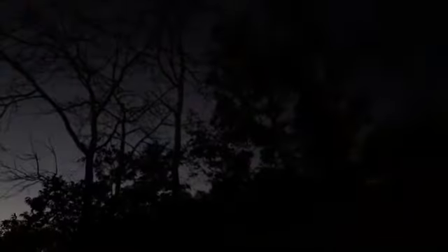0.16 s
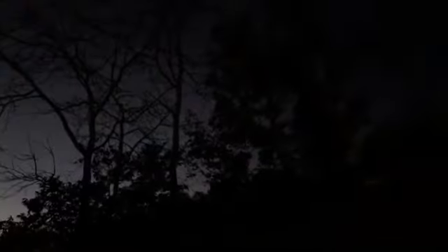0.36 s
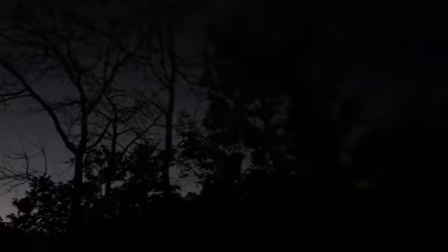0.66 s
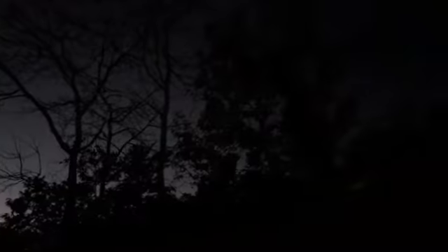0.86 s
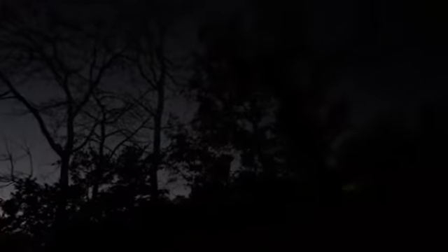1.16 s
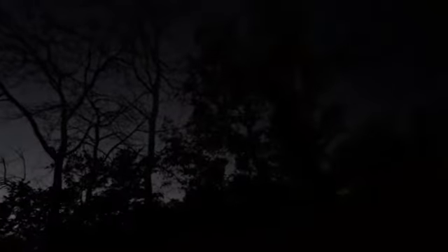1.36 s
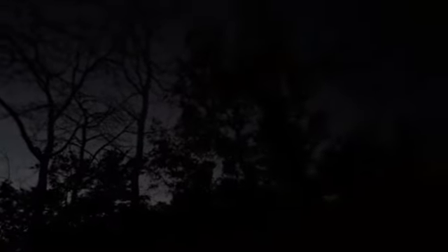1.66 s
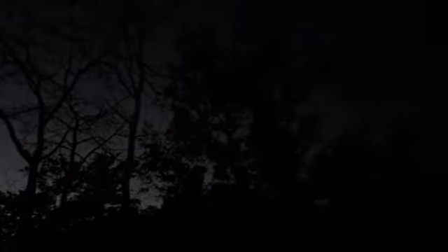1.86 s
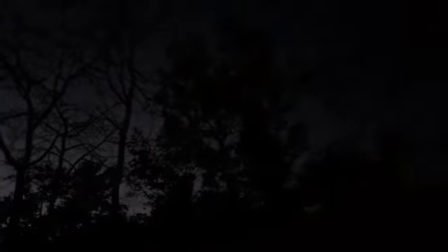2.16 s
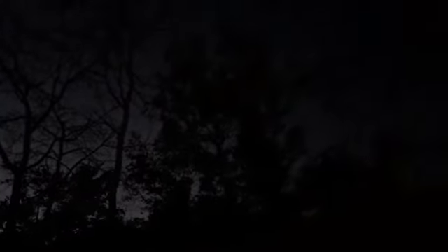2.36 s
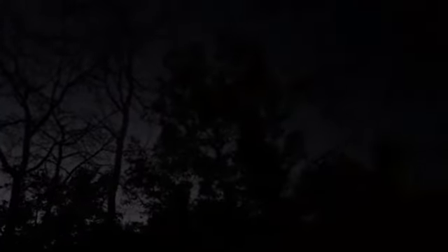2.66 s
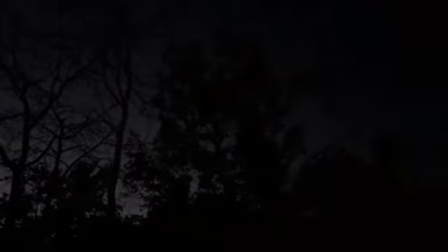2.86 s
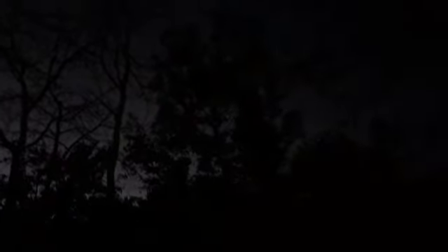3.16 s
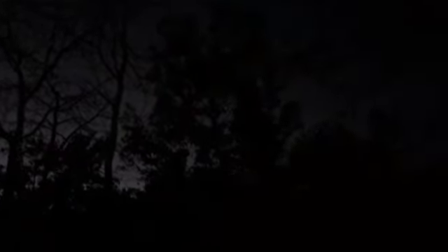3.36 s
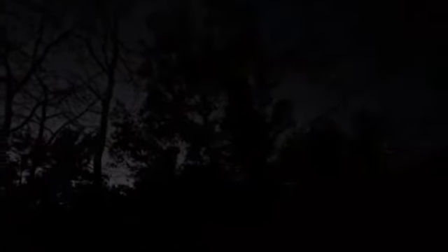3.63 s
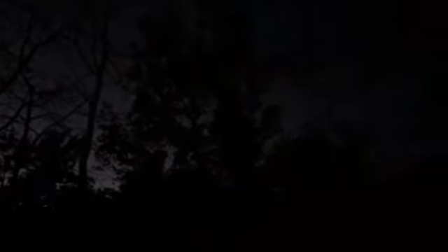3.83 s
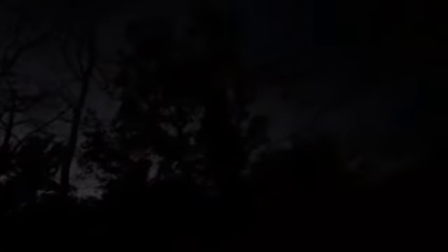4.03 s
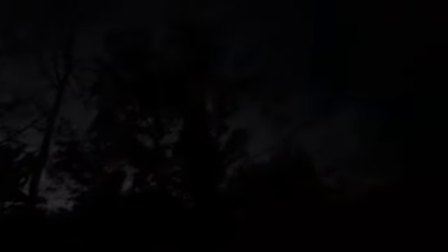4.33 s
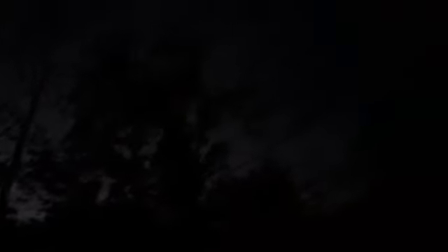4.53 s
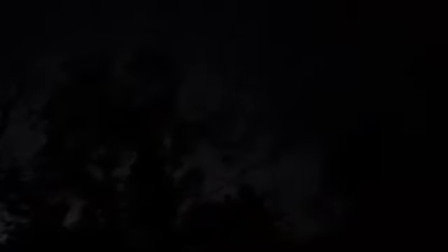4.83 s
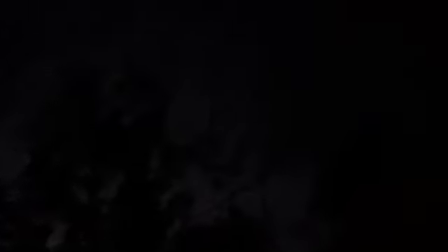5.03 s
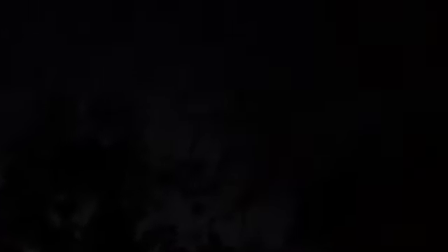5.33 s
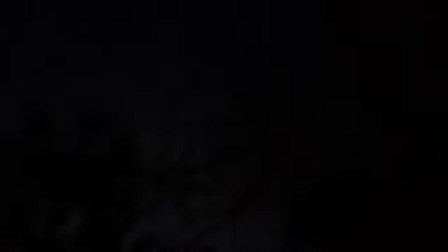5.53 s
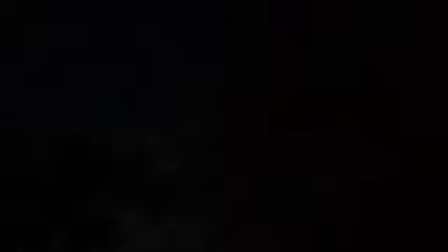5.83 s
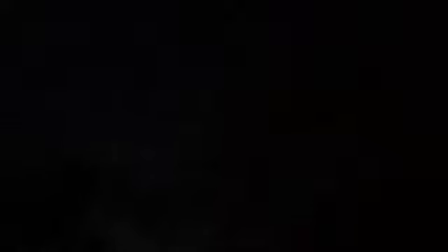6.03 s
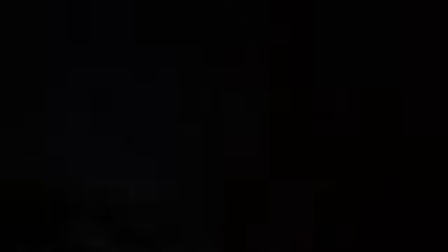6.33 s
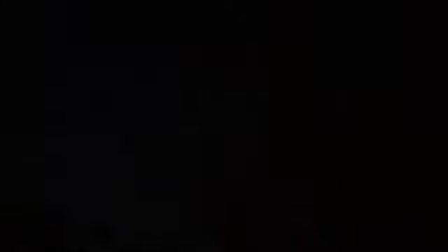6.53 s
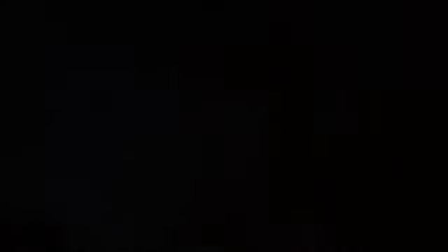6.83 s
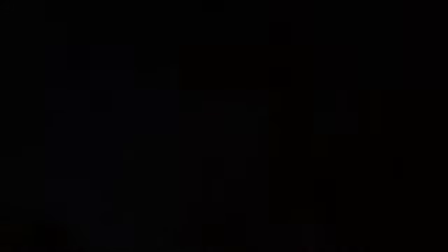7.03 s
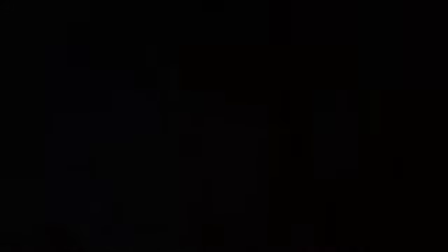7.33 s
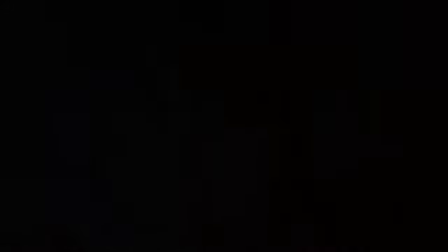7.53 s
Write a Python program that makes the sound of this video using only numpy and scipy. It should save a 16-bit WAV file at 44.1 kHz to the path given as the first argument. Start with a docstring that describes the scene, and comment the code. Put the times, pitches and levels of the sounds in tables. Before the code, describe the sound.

In windy dark woodland, rising and falling owl wails ring among the trees between soft quick trills and brief pure hoots.

```python
"""An owl wails up and down, hoarse at the start, over a low trill near 620 Hz in a wood at night;
the trees answer for a second or two. Short, almost pure toots sit higher, most of them near 850 Hz.
The voices are sums of gliding sines, straight ahead of a hand-held camera; the trees are decaying
noise echoes. A thin distant screech and a few dry ticks pass, while wind buffets the two
microphone ports over rustling leaves and distant night noise, all shaped from random noise."""
import sys
import numpy as np
from scipy import signal
from scipy.fft import rfft, irfft, next_fast_len
from scipy.io import wavfile
from scipy.ndimage import uniform_filter1d, minimum_filter1d

SR = 44100
rng = np.random.default_rng(int(sys.argv[2]) if len(sys.argv) > 2 else 0)


def int16_out(signal):
    """Quantize to a 16-bit WAV file."""
    q = np.round(np.clip(np.atleast_2d(signal).T, -1, 1) * 32767)
    wavfile.write(sys.argv[1], SR, q.astype(np.int16))


N = 339129  # samples


def undb(db):
    """Decibels to amplitude gain."""
    return 10 ** (np.asarray(db) / 20)


def curve(table):
    """Columns of a table, joined by straight lines over the times in its first column."""
    s, *columns = np.transpose(table)
    return [np.interp(np.arange(N) / SR, s, c) for c in columns]


def walk(rate):
    """Random levels held for 1 / rate seconds and smoothed twice; spread near 1."""
    hold = int(SR / rate)
    steps = np.repeat(rng.standard_normal(N // hold + 1), hold)
    return 1.36 * uniform_filter1d(uniform_filter1d(steps, hold), hold)[:N]


def bump(centre, length, flat):
    """Sample range and rounded swell, above half height for length seconds; a larger flat squares it."""
    first = max(int((centre - 2 * length) * SR), 0)
    last = min(int((centre + 2 * length) * SR), N)
    i = np.arange(first, last)
    return i, np.exp(-np.log(2) * np.abs(2 * (i / SR - centre) / length) ** flat)


def roughness():
    """Levels over time of the throb, the rasp and the period doubling in the wailing voice."""
    # hoarse stretches: centre_s, length_s, quarter-pitch throb_db, irregular rasp_db (both relative)
    rasps = [(0.155, 0.036, -18.5, -7), (3.41, .08, -22, -15), (3.483, 0.046, -10, -20),
             (3.539, .05, -7.5, -9), (3.585, 0.033, -12.5, -29), (5.802, 0.041, -9.5, -7.5),
             (5.872, 0.073, -21, -22), (7.644, 0.039, -26, -20)]
    # stretches where the period doubles: centre_s, length_s, level_db of the 1.5 x partial before its trim
    doublings = [(3.655, 0.098, -21), (3.768, .06, -43), (5.89, 0.17, -45), (6.15, .3, -51),
                 (7.69, .03, -40)]
    throb, rasp, doubled = np.zeros((3, N))
    for s, length, throb_db, rasp_db in rasps:
        i, swell = bump(s, length, flat=4.5)
        throb[i] += undb(throb_db) * swell
        rasp[i] += undb(rasp_db) * swell
    for s, length, db in doublings:
        i, swell = bump(s, length, flat=5.)
        doubled[i] += undb(db) * swell
    return throb, rasp, doubled


def wails():
    """A near-sine voice whose overtones grow with effort; partials flicker apart, throb, rasp or double."""
    # one table a wail: time_s, pitch_hz, relative fundamental_db, effort_db relative to full voice
    calls = [
        [(0.1, 814, -56.5, -90), (0.136, 817, -25, -75), (0.165, 764, -20.5, -30), (0.19, 767, -14.5, -10),
         (0.316, 831, -11, -3.5), (0.44, 852.2, -4.5, 1), (0.52, 846, -8, 0), (0.6, 830, -15, -3),
         (0.702, 801.4, -21.5, -6), (0.824, 725, -25, -18), (0.876, 705, -31.5, -30), (0.95, 770, -33, -60)],
        [(3.33, 690, -41, -80), (3.385, 771, -32, -55), (3.436, 740.5, -34, -27), (3.552, 790, -22, -17),
         (3.632, 863, -11.5, -8), (3.685, 875, -14, -3), (3.71, 852, -16, -1), (3.76, 851.3, -13, -3),
         (3.858, 799, -14.5, -3), (3.942, 757, -28, -10), (4.03, 735, -33, -20), (4.075, 714, -39, -80)],
        [(5.75, 724, -45.5, -75), (5.804, 800, -27.5, -28), (5.856, 762.6, -29, -19), (5.938, 773, -25, -15),
         (6.036, 843, -10, -4.5), (6.078, 856, -10.5, -2.5), (6.15, 844, -9.5, -2), (6.19, 834, -10.5, -5),
         (6.26, 795.4, -20, -11), (6.392, 730, -25.5, -22), (6.455, 718, -50, -70)],
        [(7.615, 705, -46, -90), (7.644, 762, -31, -22), (7.69, 773, -23.5, -12)],
    ]
    # each wail faces its own way: second_db (gain of the second partial), dull_db per multiple above the third
    facing = [(-3.5, 0), (2.5, -1.5), (2.5, -2.2), (4, -4)]
    # overtones: multiple of the pitch, level_db at full voice, db lost per db of effort
    upper = [(2, -30.5, .3), (3, -31.5, .75), (4, -43, .95), (5, -49, 1.5), (6, -58, 3.0), (7, -56, 3.0),
             (8, -64, 3.8), (9, -61, 3.8), (10, -68, 3.8)]
    # period doubling: multiple of the pitch, level_db relative to the doubling level
    halves = [(.5, -23.5), (1.5, -2), (2.5, -7.5), (3.5, -35.5)]
    throb, rasp, doubled = roughness()
    clear, hoarse, t = 0, 0, np.arange(N) / SR
    multiples = [1] + [row[0] for row in [*upper, *halves]]
    # higher partials flicker more deeply
    flicker = {k: undb(min(0.78 * k ** 1.32, 4.5) * walk(45)) for k in multiples}
    for table, (second_db, dull_db) in zip(calls, facing):
        hz, first_db, effort_db = curve(table)
        wavering_hz = uniform_filter1d(hz, size=900) * (1 + .003 * walk(70))
        turn = 2 * np.pi * np.cumsum(wavering_hz) / SR
        parts = [(1, undb(first_db))]
        for k, db, loss in upper:
            facing_db = max(k - 3, 0) * dull_db + (k == 2) * second_db
            parts.append((k, undb(db + loss * effort_db + facing_db)))
        parts += [(k, undb(db) * doubled) for k, db in halves]
        # 10 ms ramps at both ends
        on = np.clip(np.minimum(t - table[0][0], table[-1][0] + .01 - t) / .01, 0, 1)
        waves = [on * size * flicker[k] * np.sin(k * turn) for k, size in parts]
        clear = clear + sum(waves)
        # uneven cycles put side lines a quarter of the pitch apart and noise around the low partials
        uneven = np.sin(turn / 4 + 1.8 * walk(30)) + 0.56 * np.sin(turn / 2)
        shake = throb * uneven + rasp * walk(600.)
        hoarse = hoarse + shake * (waves[0] + undb(5) * waves[1] + undb(4) * waves[2])
    # the throat passes little below the fundamental
    throat = signal.butter(3, 850., "high", fs=SR, output="sos")
    return np.sqrt(2) * (clear + 2 * signal.sosfilt(throat, hoarse))


def add(out, s, hz, db, length, flat, fade, sag, octave_db):
    """Add one short note with a weak octave; its pitch arches with the swell and sags with time."""
    i, swell = bump(s, length, flat)
    late = (i / SR - s) / length
    swell = swell * np.clip(1 - fade * late, 0, None)
    note_hz = hz * (1 + 0.021 * (swell - .8) - sag * late)
    turn = 2 * np.pi * np.cumsum(note_hz) / SR
    out[i] += undb(db) * swell * (np.sin(turn) + undb(octave_db) * np.sin(2 * turn))


def toots():
    """Trill notes keep a faint octave; the higher toots peak early and die more slowly."""
    # the low trill, one row a phrase: nominal pitch_hz, notes as (centre_s, level_db)
    trills = [ (615, [(.004, -29), (.059, -28), (.125, -26.5), (.189, -26), (.251, -24.5), (.315, -26),
              (.377, -22.5), (.435, -26), (.497, -41)]), (626.8, [(.667, -22.5), (.75, -20.5),
              (.843, -19.5), (.943, -20.5), (1.049, -20.5), (1.155, -21), (1.264, -22.5), (1.369, -26),
              (1.468, -23), (1.543, -24), (1.606, -25.5), (1.672, -28.5), (1.729, -37.5)]),
              (620, [(2.748, -26.5), (2.822, -21.5), (2.893, -20), (2.959, -20.5), (3.026, -21.5),
              (3.089, -20.5), (3.153, -22), (3.217, -21), (3.279, -22.5), (3.339, -25), (3.397, -36)]),
              (615, [(3.519, -35), (3.57, -32.5), (3.658, -27), (3.752, -29.5), (3.853, -33.5),
              (3.966, -31), (4.068, -32), (4.162, -29.5), (4.262, -27.5), (4.351, -25.5), (4.42, -24),
              (4.482, -24.5)]), (618.4, [(6.39, -30.5), (6.461, -27.5), (6.527, -26.5), (6.588, -24),
              (6.653, -25.5), (6.715, -23), (6.777, -24), (6.84, -25), (6.899, -25.5), (6.958, -28.5),
              (7.013, -30), (7.069, -28.5), (7.132, -24), (7.217, -22.5), (7.311, -21.5), (7.409, -21),
              (7.512, -23), (7.613, -24)]), ]
    # higher toots: nominal centre_s, nominal pitch_hz, level_db, length_s at half height before the fade
    high_toots = [(0.07, 802, -32.5, 0.023), (1.012, 822, -22.5, 0.047), (1.119, 817.5, -20.5, 0.037),
                  (1.229, 809.7, -23, 0.043), (1.322, 816, -22.5, 0.03), (1.39, 812.5, -23, 0.032),
                  (1.456, 804, -26, 0.034), (1.518, 800, -27.5, 0.021), (1.581, 801, -28.5, 0.018),
                  (1.69, 732, -37.5, 0.1), (4.185, 848, -33, 0.023), (4.252, 837, -29.5, 0.017),
                  (4.32, 927, -29, 0.037), (4.498, 852, -31.5, 0.031), (4.703, 896, -19.5, 0.045),
                  (5.007, 900, -18.5, 0.039), (5.285, 895, -21.5, 0.035), (5.522, 916, -33, 0.025),
                  (5.735, 876, -27, 0.035), (5.889, 882, -21, 0.023)]
    # notes lengthen when the trill slows; soft notes and the first and last of a phrase go flat
    base_length_s, longer_per_gap = .021, .075
    flat_hz_per_db, edge_flat_hz = 0.9, 11
    out = np.zeros(N)
    for phrase_hz, notes in trills:
        s, db = np.transpose(notes)
        hz = phrase_hz + flat_hz_per_db * (db - db.max())
        hz[[0, -1]] -= edge_flat_hz
        length = base_length_s + longer_per_gap * np.gradient(s)
        for k, chance in enumerate(rng.standard_normal((len(s), 2))):
            add(out, s[k], hz[k] + 3. * chance[0], db[k], length[k], 2.8,
                fade=0, sag=.0094, octave_db=-32 + 3.5 * chance[1])
    for s, hz, db, length in high_toots:
        add(out, s + .0045, hz, db, length, 2.7, fade=.5, sag=0.0315, octave_db=-44.5)
    return out


def screech():
    """A thin distant screech: steady bright partials with a breathy edge, sudden and then fading."""
    # onset_s, relative level_db, fade_db per s
    onset_s, level_db, fade_db = (3.322, -53, 70)
    # partials: pitch_hz, breath_hz (half the rate of its random level), relative level_db
    partials = [(1370, 30, 4), (2680, 40, 3), (3860, 44, -2), (4000, 65, -5.5), (4170, 71, -2.5),
                (5250, 130, -10)]
    t = np.arange(N) / SR
    tones = 0
    for hz, breath_hz, db in partials:
        breath = 1 + 1.1 * walk(2 * breath_hz)
        tones = tones + undb(db) * breath * np.sin(2 * np.pi * hz * t)
    onset = np.clip((t - onset_s) / .006 + 1, 0, 1)
    return np.sqrt(2) * onset * undb(level_db - fade_db * (t - onset_s)) * tones


def ticks():
    """Small dry ticks close by: bursts of treble that decay in under a millisecond."""
    # start_s, level_db
    clicks = [(4.7406, -44), (4.753, -32), (4.764, -39)]
    out = np.zeros(N)
    i = np.arange(200)
    for s, db in clicks:
        # differencing the noise twice leaves mostly treble
        treble = np.diff(rng.standard_normal(202), 2) / 2
        out[int(s * SR) + i] += undb(db) * treble * np.exp(-i / SR / 0.00059)
    return out


def trees(x, t60_s, gap_s, damp_hz, sway):
    """Scattered echoes from trunks, duller than the call; swaying boughs trade one pattern for another."""
    t = np.arange(2 * SR) / SR
    # 60 dB down after t60_s, building up over gap_s
    fade = np.exp(-np.log(1000) * t / t60_s) * np.clip(t / gap_s, 0, 1)
    # energy near 1 before the damping
    echoes = rng.standard_normal((2, len(t))) * fade / np.sqrt(np.sum(fade ** 2))
    tails = signal.lfilter(*signal.butter(2, damp_hz, fs=SR), echoes)
    one, other = signal.fftconvolve(x[None], tails, axes=1)[:, :N]
    mix = sway * walk(9)  # radians
    return np.cos(mix) * one + np.sin(mix) * other


def hush(colour, lo_hz, hi_hz, flicker_db, rate):
    """Coloured noise, rms 1 between lo_hz and hi_hz before its octaves flicker independently."""
    size = next_fast_len(N)
    f = np.maximum(np.arange(size // 2 + 1) * SR / size, 1)
    hz, db = np.transpose(colour)
    tilt = undb(np.interp(np.log(f), np.log(hz), db, left=-90))
    spec = rfft(rng.standard_normal(size)) * tilt
    inside = (f > lo_hz) & (f < hi_hz)
    spec /= np.sqrt(2 * np.sum(np.abs(spec[inside]) ** 2)) / size
    octave = np.log2(f / 20)
    out = 0
    for k in range(int(np.log2(hz[0] / 20)), 11):
        # overlapping triangular octave bands
        band = irfft(spec * np.clip(1 - np.abs(octave - k), 0, 1), size)[:N]
        out = out + undb(flicker_db * walk(rate)) * band
    return out


def night():
    """Wind and leaves differ at the two ports; the distant noise is partly shared."""
    # time_s, steady wind_db on the ports before port gains, distant noise_db, leaves_db
    levels = [(0, -55, -46.5, -65), (.13, -53.5, -48.5, -66), (.26, -60.5, -62, -66.5),
              (.36, -61.5, -52.5, -65), (1, -61, -54.5, -65.5), (1.5, -62, -52.5, -64),
              (2.3, -57, -52, -63), (2.85, -50, -49, -57.5), (3.15, -60, -50, -59.5),
              (3.7, -50, -47.5, -59), (4.2, -60.5, -49.5, -60), (5.05, -54, -48.5, -58.5),
              (5.65, -54, -46, -53), (6, -49, -46.5, -54.5), (6.7, -48, -45, -54),
              (7.45, -46.5, -46.5, -58.5), (7.69, -42.5, -43.5, -63.5)]
    # gusts that thump the ports: centre_s, length_s, rise_db above the steady wind
    gusts = [(0.082, 0.079, 16), (0.381, .12, 15.5), (.82, .06, 8), (1.06, 0.059, 15), (1.22, .08, 9),
             (1.69, 0.081, 15.5), (3.03, .06, 10), (3.62, .14, 11), (5.8, 0.069, 8.5), (5.992, 0.11, 10),
             (6.88, .08, 9.5), (7.65, .06, 11)]
    # noise colours: frequency_hz, relative density_db per Hz
    wind_colour, far_colour, leaf_colour = [(20, -16), (45, -12.5), (70, -2), (110, -4), (200, -9.5),
                                            (400, -19), (800, -47.5), (1600, -80)], [(60, -13), (150, 0), (300, 3), (500, -1.5),
                                                          (900, -6.5), (1500, -24), (2000, -10),
                                                          (2600, -14.5), (2900, -31), (5000, -34.5),
                                                          (9000, -48.5)], [(500, 10.5), (1500, 12.5), (3000, 7),
                                                                       (6500, 4.5), (8500, -1.5),
                                                                       (12000, 0.5), (15500, -4.5)]
    wind_db, far_db, leaves_db = curve(levels)
    buffet_db = 2.5 * walk(14)
    for s, length, db in gusts:
        i, swell = bump(s, length, flat=2.5)
        buffet_db[i] += db * swell
    # gusty on both ports, each with its own flutter
    wind = np.array([undb(buffet_db + 1.3 * walk(20)) * hush(wind_colour, 25, 130, 2.5, 9) for _ in range(2)])
    wind = wind * undb([[1.5], [-1.8]])
    rustle = np.array([hush(leaf_colour, 9000, 13600, 0.56, 16) for _ in range(2)])
    leaves = undb(0.63 * walk(8)) * rustle
    mid = hush(far_colour, 240, 480, 1.2, 8.8)
    side = hush(far_colour, 200, 480, 1.2, 8)
    far = mid + undb(-10) * side * np.array([[1], [-1]])
    return undb(wind_db) * wind + undb(far_db) * far + undb(leaves_db) * leaves


def scene():
    """The birds sit in the centre; the wails fill the wood more than the toots do."""
    wail, toot = wails() + screech(), toots()
    # nearby twigs scatter the short waves of the overtones more than the fundamental
    overtones = signal.sosfilt(signal.butter(2, 1300., "high", fs=SR, output="sos"), wail)
    scattered = wail + undb(-3) * overtones
    near = trees(undb(-8.5) * scattered + undb(-20.5) * toot, t60_s=0.32, gap_s=.02, damp_hz=9000, sway=1.06)
    far = trees(undb(-14.5) * wail + undb(-26) * toot, t60_s=2.28, gap_s=.08, damp_hz=2770, sway=2.25)
    return undb(0.31) * wail + toot + near + far + ticks() + night()


def record(dry):
    """A limiter turns both channels down around the loudest peaks; the camera cuts the top."""
    ceiling, top_hz = .62, 15500
    room = np.minimum(1, ceiling / (np.abs(dry).max(axis=0) + 1e-9))
    span = int(.012 * SR)  # 12 ms smoothing
    gain = uniform_filter1d(minimum_filter1d(room, 2 * span), span)
    return signal.sosfilt(signal.ellip(12, .2, 90, top_hz, fs=SR, output="sos"), dry * gain)


dry = scene()
out = record(dry)
int16_out(out)
```